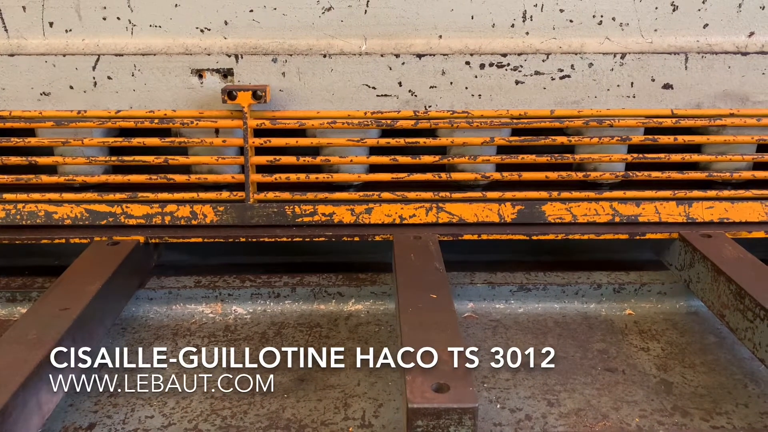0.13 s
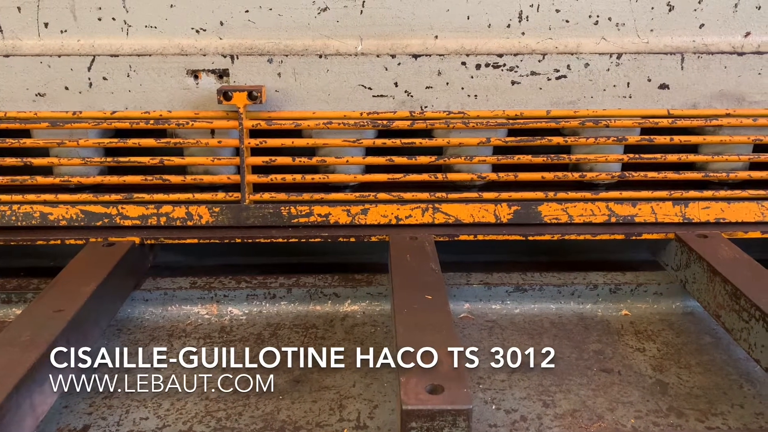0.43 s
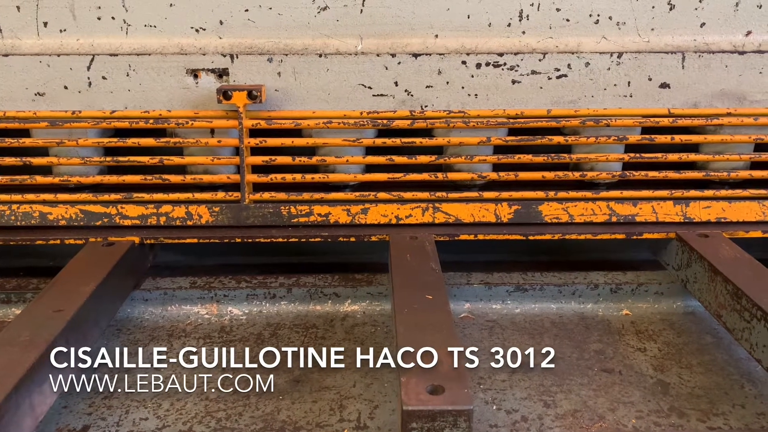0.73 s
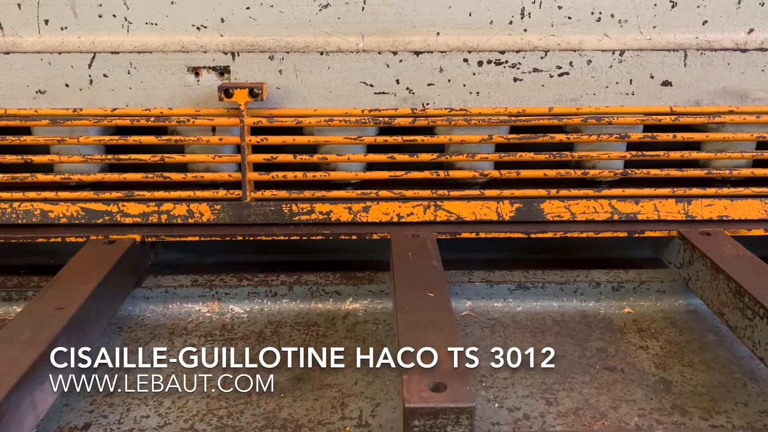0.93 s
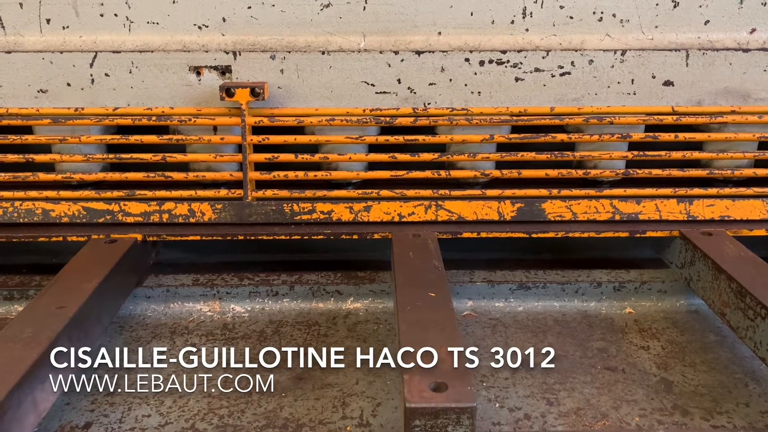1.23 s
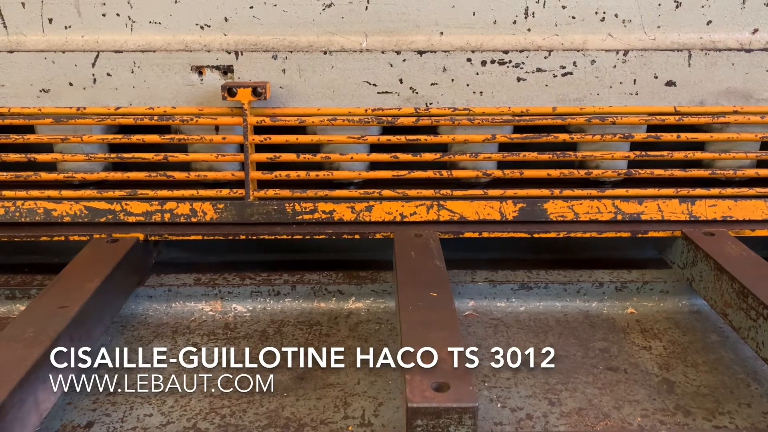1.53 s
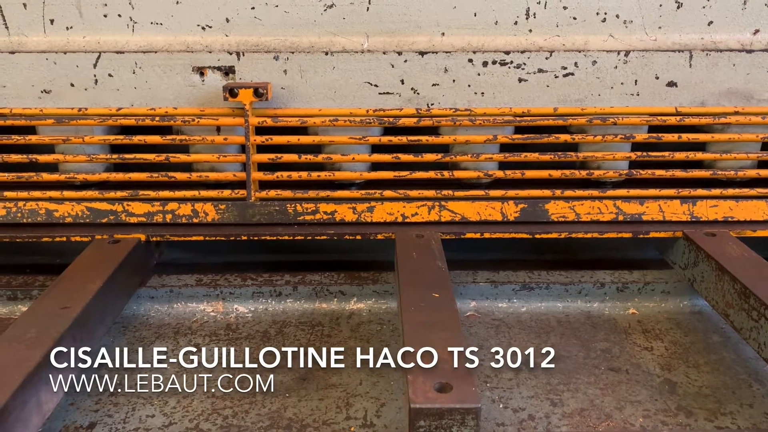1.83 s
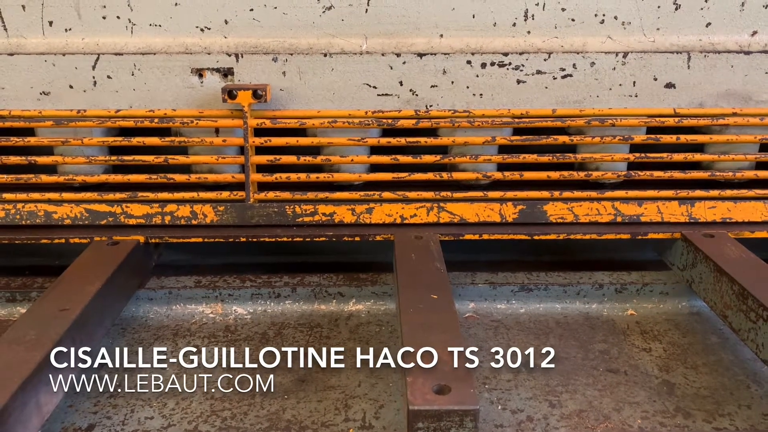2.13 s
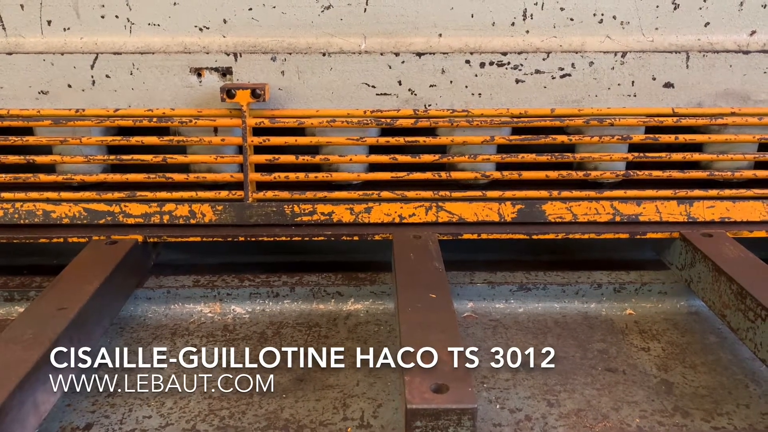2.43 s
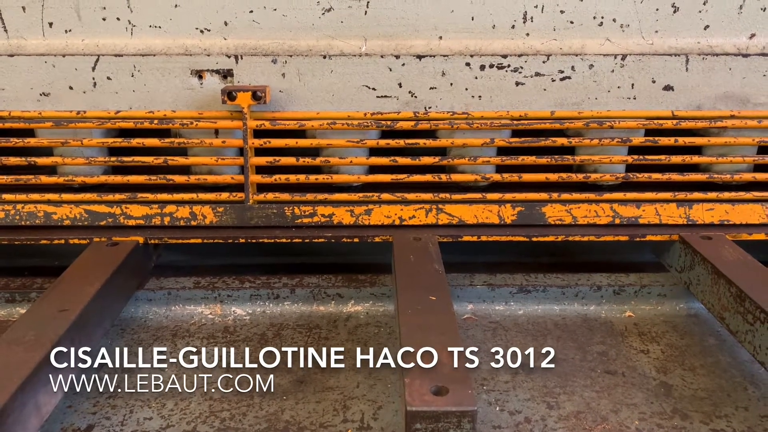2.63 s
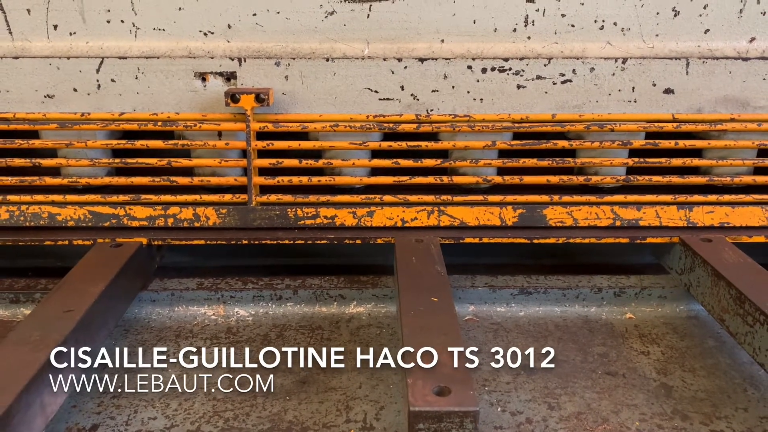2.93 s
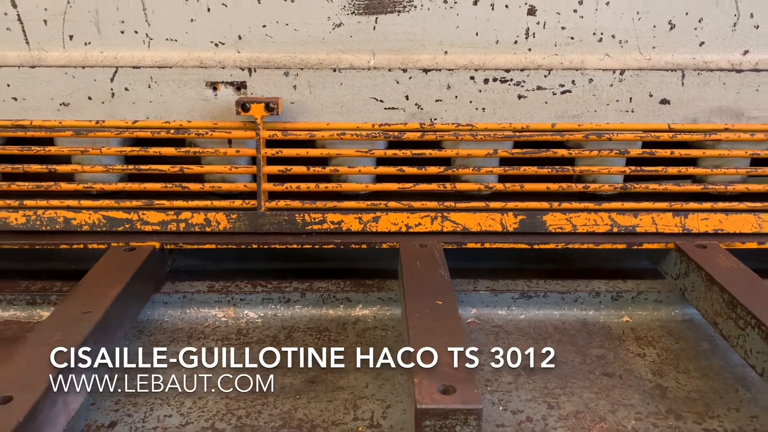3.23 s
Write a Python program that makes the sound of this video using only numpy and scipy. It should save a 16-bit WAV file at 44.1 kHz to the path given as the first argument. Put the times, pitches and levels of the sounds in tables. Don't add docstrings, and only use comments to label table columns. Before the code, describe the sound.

A hydraulic sheet metal shear hums at idle, then a valve slams with a heavy frame clunk; the pump drones louder and flutters, faint ticks follow, and a softer clunk reverses it. Workshop, close stereo microphone.

```python
import sys
import numpy as np
from scipy import signal
from scipy.fft import rfft, irfft
from scipy.io import wavfile
from scipy.ndimage import uniform_filter1d

SR = 44100
rng = np.random.default_rng(int(sys.argv[2]) if len(sys.argv) > 2 else 0)


def generate_wav(signal):
    frames = np.transpose(np.atleast_2d(signal))
    scaled = np.clip(frames, -1, 1) * 32767
    pcm = np.round(scaled).astype(np.int16)
    wavfile.write(sys.argv[1], SR, pcm)


def gain_from_decibels(decibels):
    exponent = np.asarray(decibels, float) / 20
    return 10 ** exponent


N = 148617
T = np.arange(N) / SR
TOOTH_HZ, TEETH = 248.33, 10
SHAFT_HZ = TOOTH_HZ / TEETH


def evened(x):
    return x / np.sqrt(np.mean(np.abs(x) ** 2) + 1e-20)


def read(points, hz):
    f, value = np.transpose(points)
    return np.interp(np.log(hz + 1), np.log(f + 1), value)


def coloured(x, points):
    gain = gain_from_decibels(read(points, np.fft.rfftfreq(N, 1 / SR)))
    return irfft(rfft(x) * gain, N)


def states(t):
    stroke_s, reverse_s, switch_s = 1.31, 2.995, 0.048
    on, back = np.clip((t - np.array([[stroke_s], [reverse_s]])) / switch_s + .5, 0, 1)
    return np.array([1 - on, on - back, back])


def tone(hz, db, pan_db, lead, wobble, phase):
    wobble_hz = 14
    at = np.arange(0, T[-1] + 1, 1 / wobble_hz / 2)
    drift = rng.standard_normal((200, 2))[:len(at)] @ [1, 1j]
    waver = 1 + wobble * np.interp(T, at, drift)
    z = np.sqrt(2) * gain_from_decibels(db) * waver * np.exp(2j * np.pi * hz * T + 1j * phase)
    side = gain_from_decibels(pan_db / 2) * np.exp(.5j * lead)
    constant_power = np.sqrt(2 / (abs(side) ** 2 + abs(side) ** -2))
    return np.array([z * side, z / side]).real * constant_power


# (order, idle [dB], working [dB], returning [dB])
PUMP_ORDERS = [(3, -39, -46.5, -42), (4, -51, -39.5, -38.5), (5, -39, -39.5, -42.5), (6, -42, -40, -39),
               (7, -44, -42.5, -37), (8, -50.5, -48, -53), (9, -50, -44, -42), (10, -53, -59, -58),
               (11, -48.5, -50, -49), (15, -63, -52, -53), (16, -57, -62, -62), (18, -73, -58, -61),
               (19, -62, -59, -58), (14, -56, -58, -58), (23, -81, -81, -73), (24, -48.5, -57, -68),
               (25, -56, -66, -57), (26, -78, -53, -64)]
# (order, left-right idle [dB], working [dB], left lead idle [rad], working [rad])
STANDING_WAVES = [(1, 0.8, 3.5, -1, -0.9), (2, -1.5, 7, 0.36, 1.25), (3, -5.5, 27, -0.1, 2),
                  (4, -25, 0, 4.5, -13), (5, 0.5, 0.5, 0.5, -5.2), (6, 6.5, 26, -3.5, 6.5),
                  (7, 3, -18, -0.8, 8.5), (8, 4, 4, -1, -5), (9, 14, 6, -2, -1), (10, -6, 47, 4.5, 13.5),
                  (11, 3, -14, 1.7, 10), (24, -7, -5, 0, 1)]
# (time [s], tooth tone [dB], octave [dB])
EFFORT = [(0, -26, -36), (.25, -27, -34), (.5, -25, -31), (.8, -26.5, -28.5), (1.05, -25.5, -27.5),
          (1.27, -31.5, -28), (1.4, -18.5, -35), (1.65, -17, -26.5), (2, -18.5, -27), (2.5, -18, -26),
          (2.97, -18.5, -26.5), (3.08, -20.5, -25.5), (3.2, -21, -24.5), (3.37, -18, -22.5)]
RETURN_PAN_DB = [3, -6.5]
# (time [s], depth [0-1], width [s])
BOUNCES = [
    (1.377, .72, .015),
    (1.478, .96, .018),
    (1.553, .86, .028),
    (1.622, .72, .014),
    (1.706, .46, .013),
    (1.787, .57, .010),
    (1.96, .22, .016),
]


def pump():
    skew, sideband_db = -.15, -30
    steady, slack, rough_idle, rough_work = .08, .09, .12, .28
    share = states(T)
    idle, returning = share[0], share[2]
    loaded = 1 - idle
    s, *effort = np.transpose(EFFORT)
    place = {row[0]: row[1:] for row in STANDING_WAVES}
    levels = [(k + 1, np.interp(T, s, db)) for k, db in enumerate(effort)]
    levels += [(k, db @ share) for k, *db in PUMP_ORDERS]
    rough = rough_work + (rough_idle - rough_work) * idle
    out = 0
    for k, db in levels:
        pan0, pan1, lead0, lead1 = place.get(k, (0, 0, *rng.uniform(-2.7, 0.67, 2)))
        pan = pan0 + (pan1 - pan0) * loaded + returning * (RETURN_PAN_DB + [0] * 30)[k - 1]
        lead = lead0 + (lead1 - lead0) * loaded
        wobble = steady + slack * idle / k if k < 3 else rough
        out += tone(k * TOOTH_HZ, db, pan, lead, wobble, skew * (k - 1))
    surge = np.prod([1 - depth * np.exp(-((T - at) / width) ** 2) for at, depth, width in BOUNCES], axis=0)
    return out * surge * (1 + 2 * gain_from_decibels(sideband_db) * np.sin(2 * np.pi * SHAFT_HZ * T))


# (frequency [Hz], level [dB], t60 [s])
FRAME_MODES = [(43.4, 2, 0.11), (64.1, 3.5, 0.52), (106.8, 1, 0.14), (144.3, 1.5, 0.4), (220.1, 4.5, 0.14),
               (339, -7, 0.11), (420, 2.5, 0.11), (615, -9, 0.1)]
# (time [s], level [dB], t60 [s])
SHUDDERS = [
    (1.302, -16, 2.1),
    (2.988, -25, 2.4),
]
# (time [s], pitch [Hz], peak [dB], t60 [s])
KNOCKS = [(1.275, 100, -7.5, 0.091), (1.292, 190, -2.5, 0.042), (1.323, 489, -13, 0.097),
          (1.324, 387, -15, 0.08), (1.343, 610, -18, 0.07), (1.335, 129, -7, 0.13),
          (1.349, 353, -14.5, 0.13), (1.361, 133, -3, 0.063), (1.327, 880, -20, 0.086),
          (1.395, 47, -25, 0.49), (2.995, 1760, -18, 0.052), (2.996, 1950, -23, 0.05),
          (2.997, 1497, -18.5, 0.04), (2.996, 1000, -21, 0.043), (3.036, 980, -21, 0.05),
          (2.7, 520, -21, 0.08), (3.015, 472, -18, 0.063), (1.347, 450, -16, 0.07), (1.352, 760, -20, 0.06)]
# (time [s], pitch [Hz], peak [dB], t60 [s])
BOOMS = [
    (2.998, 76, -19, 0.2),
    (3.053, 70, -22, 0.9),
    (3.2, 82, -29, 0.7),
]


def frame():
    t = T[:SR]
    ring = sum(gain_from_decibels(db - 60 * t / t60) * np.sin(2 * np.pi * hz * t) / np.sqrt(t60) for hz, db, t60 in FRAME_MODES)
    shake = rng.standard_normal((2, N))
    rumble = evened(signal.fftconvolve(shake, ring[None], axes=1)[:, :N])
    rise_s = 0.026
    thud = rumble * sum(gain_from_decibels(db - 60 * (T - s) / t60) * np.clip((T - s) / rise_s, 0, 1) for s, db, t60 in SHUDDERS)
    for s, hz, db, t60 in KNOCKS + BOOMS:
        t = np.maximum(T - s, 0)
        onset = np.minimum(t * hz, 1)
        thud = thud + gain_from_decibels(db - 60 * t / t60) * onset * np.sin(2 * np.pi * hz * t)
    return thud


# (time [s], clang [dB], hiss [dB], rise [s], t60 [s])
BLOWS = [
    (1.307, -17, -25, 0.014, 0.16),
    (1.333, -15.5, -28, 0.0066, 0.12),
    (2.992, -21, -36.5, 0.0065, 0.23),
]


def swell(column, hall_db, hall_t60):
    energy = 0
    for row in BLOWS:
        start, rise, t60 = row[0], row[3], row[4]
        t = np.maximum(T - start, 0)
        late = np.maximum(t - rise, 0)
        attack = (gain_from_decibels(row[column]) * np.minimum(t / rise, 1)) ** 2
        hall = gain_from_decibels(2 * hall_db - 120 * late / hall_t60) * np.minimum(t / 0.01, 1)
        energy += attack * (gain_from_decibels(-120 * late / t60) + hall)
    return np.sqrt(energy)


# (frequency [Hz], level [dB])
CLANG = [(150, -5), (450, 5), (800, -5), (1800, -4), (4000, -14), (8000, -26.5)]


def guards():
    rattle = rng.standard_normal((2, N))
    return evened(coloured(rattle, CLANG)) * swell(1, hall_db=-6.5, hall_t60=0.79)


# (frequency [Hz], level [dB])
HISS = [(2000, -20), (4000, -13), (6500, 6.5), (8500, 0), (10700, 10), (13500, -7), (15500, -27)]


def spit():
    jet = rng.standard_normal((2, N))
    return evened(coloured(jet, HISS)) * swell(2, hall_db=-13.5, hall_t60=0.95)


def clicks(table):
    high_pass = signal.butter(2, 8000, "high", fs=SR, output="sos")
    bright = signal.sosfilt(high_pass, rng.standard_normal((2, N)))
    rise_s = .001
    burst = sum(gain_from_decibels(db) * np.exp(-np.maximum((T - s) / decay, (s - T) / rise_s)) for s, db, decay in table)
    return evened(bright) * burst


# (time [s], level [dB], decay [s])
STRIKES = [
    (1.316, -27, .003),
    (1.319, -25, .003),
    (1.324, -25, .004),
    (1.334, -26, .003),
    (1.346, -28, .003),
    (2.998, -38, .004),
]


def valve_strikes():
    return clicks(STRIKES)


# (time [s], level [dB], decay [s])
TICKS = [
    (1.446, -30, .003),
    (1.526, -41, .002),
    (1.605, -30, .005),
    (1.62, -39, .004),
]


def hold_down_ticks():
    return clicks(TICKS)


# (frequency [Hz], density [dB per Hz])
IDLE_FLOW = [(75, -65.5), (160, -71.5), (250, -60.5), (600, -67), (1800, -70.5), (4000, -81), (9000, -83),
             (15500, -80)]
# (frequency [Hz], density [dB per Hz])
WORKING_FLOW = [(25, -74), (60, -62), (250, -58.5), (650, -62.5), (1100, -63), (3000, -68), (5200, -80.5),
                (15500, -88)]
# (frequency [Hz], density [dB per Hz])
RETURNING_FLOW = [(25, -62), (70, -64), (250, -54.5), (650, -65), (1100, -61), (3000, -67), (5000, -79.5),
                  (15500, -82)]


def oil():
    whistle_hz, whistle_width_hz, whistle_db = 6400, 450, 4
    groan_hz, groan_width_hz, groan_db, groan_s, groan_span_s = 1030, 170, 5, 2.5, 0.59
    patchy_db, puff = 1.6, .1
    frames, hz = N // 256 + 5, np.fft.rfftfreq(1024, 1 / SR)
    t = np.arange(frames) * 256 / SR
    a, b, c, d, patches = rng.standard_normal((frames, 513, 5)).T
    patches = uniform_filter1d(patches, size=5, axis=0)
    patches = evened(uniform_filter1d(patches, size=20, axis=1))
    spectra = [read(points, hz) for points in (IDLE_FLOW, WORKING_FLOW, RETURNING_FLOW)]
    db = np.transpose(spectra) @ states(t)
    row_hz = hz[:, None]
    db += whistle_db * np.exp(-((row_hz - whistle_hz) / whistle_width_hz) ** 2) + patchy_db * patches
    db += groan_db * np.exp(-((row_hz - groan_hz) / groan_width_hz) ** 2 - ((t - groan_s) / groan_span_s) ** 2)
    z = np.array([a + 1j * b, c + 1j * d])
    white = signal.istft(z[0], nperseg=1024, noverlap=768)[1]
    unit = np.sqrt(np.mean(white ** 2) * 2 / SR)
    flow = signal.istft(z * gain_from_decibels(db), nperseg=1024, noverlap=768)[1][:, :N] / unit
    return flow * (1 + puff * np.cos(2 * np.pi * TOOTH_HZ * T))


# (frequency [Hz], idle [dB], working [dB])
MOTOR_TONES = [(96.3, -46, -51.5), (297.5, -48, -44.5), (843, -38.5, -39), (966, -45.5, -41),
               (5850, -84, -97)]


def motor():
    shaft_db, spread_db, tilt_db = -57, 3, -2
    idle, out = states(T)[0], 0
    for hz, idle_db, work_db in MOTOR_TONES:
        out += tone(hz, work_db + (idle_db - work_db) * idle, 0, -hz / 900, 0.15 + 30 / hz, hz)
    k = np.arange(2, 120)
    size, turn, lead = rng.standard_normal((len(k), 3)).T
    gain = gain_from_decibels(shaft_db + spread_db * size + tilt_db * np.log2(k / TEETH))
    gain = gain * (k % TEETH > 0)
    angle = np.linspace(0, 2 * np.pi, 2049)
    for_ports = []
    for side in (-1, 1):
        phase = 9 * turn + side * lead * k / 40
        one_turn = gain @ np.sin(k[:, None] * angle + phase[:, None])
        for_ports.append(np.interp(T * SHAFT_HZ % 1, angle / 2 / np.pi, one_turn))
    return out + for_ports


# (frequency [Hz], coherence [0-1])
COHERENCE = [(40, .99), (250, .93), (1000, .72), (2000, .55), (4000, .3), (6500, .6), (7800, .9),
             (15000, .9)]
# (frequency [Hz], lag [cycles])
LAG = [(0, 0), (2500, .5), (6300, 1), (8150, 1.47), (8700, 1.53), (11000, 2), (13000, 2.47), (13800, 2.55),
       (15700, 3)]
# (frequency [Hz], left-right level [dB])
BALANCE = [(100, 0.3), (800, -2.5), (1700, 4), (3000, 0.5), (5500, -4), (7000, 3.5), (15000, -1)]


def ports(pair):
    hz = np.fft.rfftfreq(N, 1 / SR)
    a, b = rfft(pair)
    same = np.clip(read(COHERENCE, hz), 0, 1)
    pan = gain_from_decibels(read(BALANCE, hz) / 2)
    shift = np.exp(2j * np.pi * np.interp(hz, *np.transpose(LAG)))
    right = same * a * shift + np.sqrt(1 - same ** 2) * b
    return irfft([a * pan, right / pan], N)


def scene():
    blows = frame() + guards() + spit()
    return pump() + motor() + ports(oil() + blows + valve_strikes()) + hold_down_ticks()


def top_cut(x):
    return signal.sosfilt(signal.butter(12, 17070, fs=SR, output="sos"), x)


# (frequency [Hz], level [dB])
CAPSULE = [(12500, 0), (14500, -4)]


def record(dry):
    ceiling = .9
    high_pass = signal.butter(3, 44, "high", fs=SR, output="sos")
    low_cut = signal.sosfilt(high_pass, coloured(dry, CAPSULE))
    saturated = ceiling * np.tanh(low_cut / ceiling)
    edge = signal.firwin(511, 15720, window=("kaiser", 9), fs=SR)
    mix = signal.oaconvolve(saturated, edge[None], "same")
    return top_cut(mix)


dry = scene()
out = record(dry)
generate_wav(out)
```